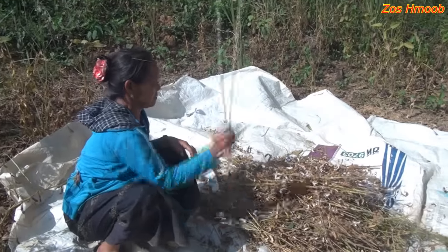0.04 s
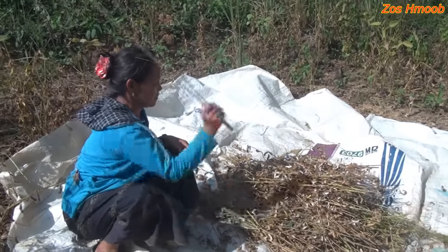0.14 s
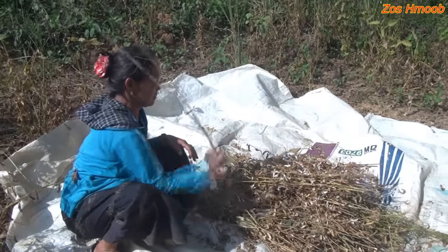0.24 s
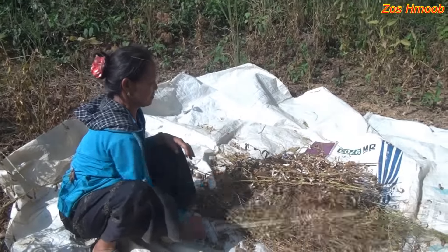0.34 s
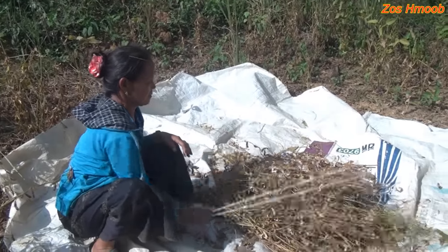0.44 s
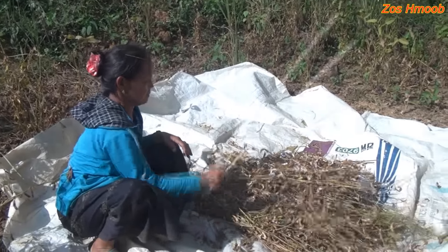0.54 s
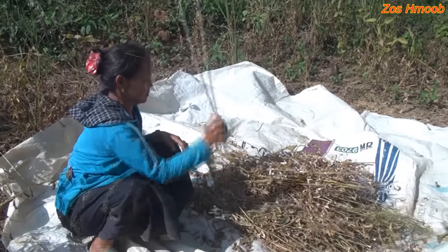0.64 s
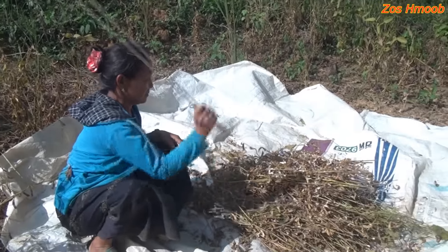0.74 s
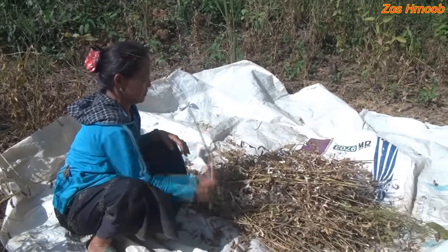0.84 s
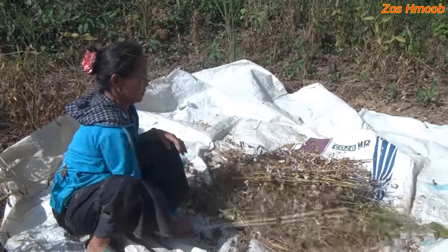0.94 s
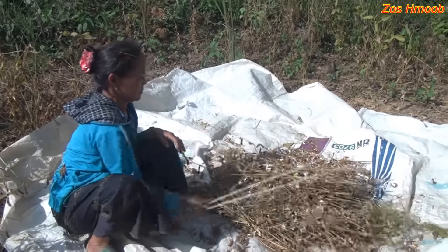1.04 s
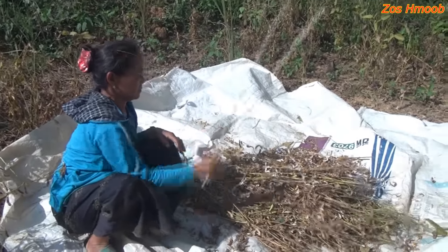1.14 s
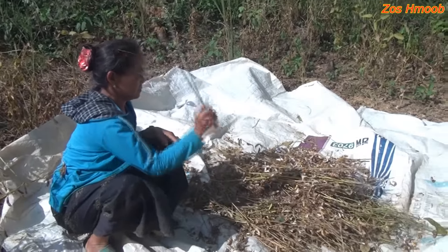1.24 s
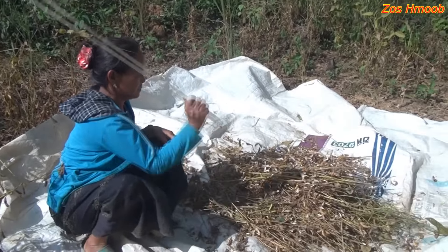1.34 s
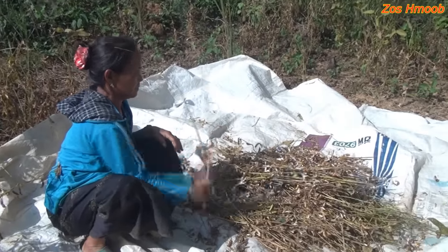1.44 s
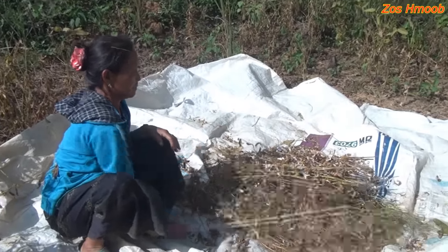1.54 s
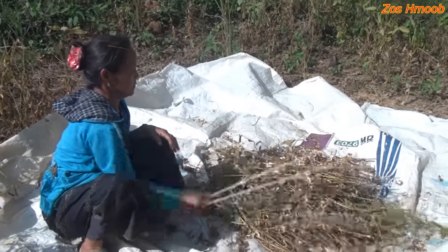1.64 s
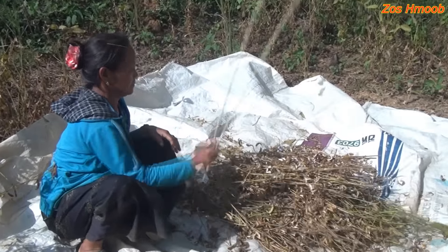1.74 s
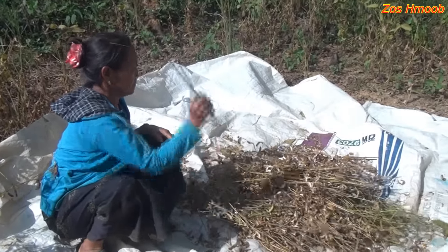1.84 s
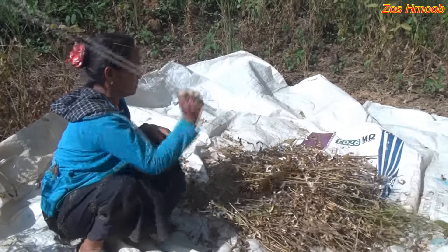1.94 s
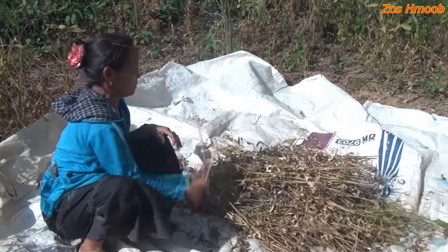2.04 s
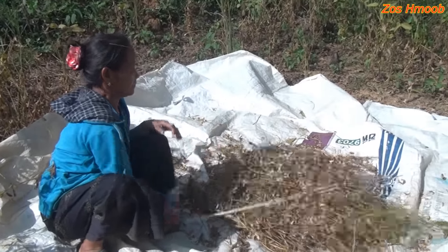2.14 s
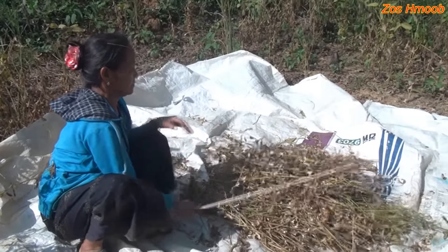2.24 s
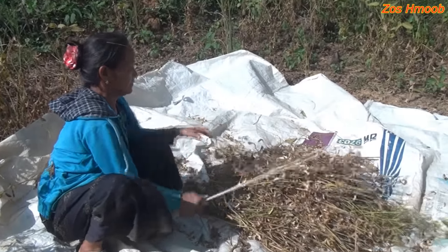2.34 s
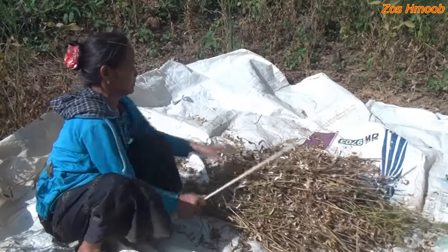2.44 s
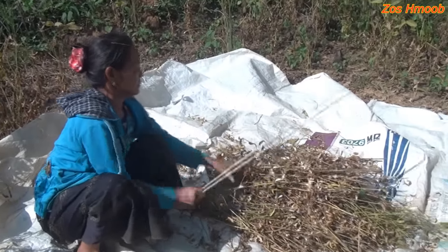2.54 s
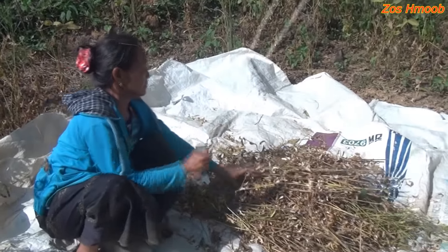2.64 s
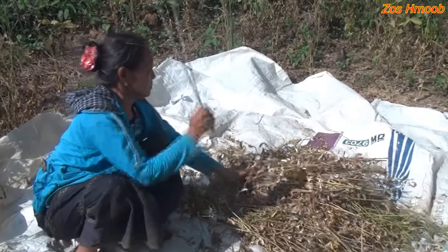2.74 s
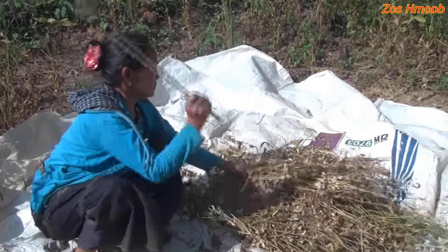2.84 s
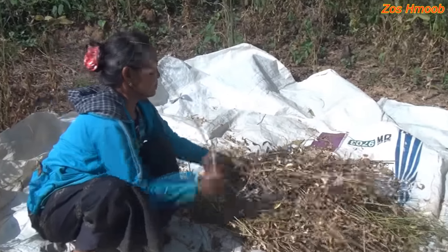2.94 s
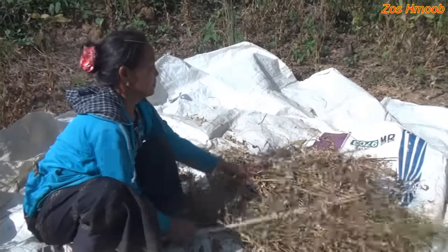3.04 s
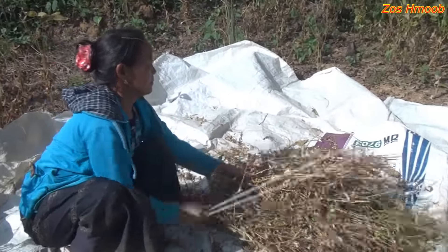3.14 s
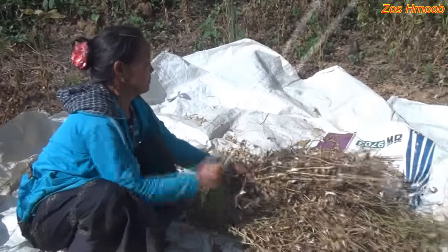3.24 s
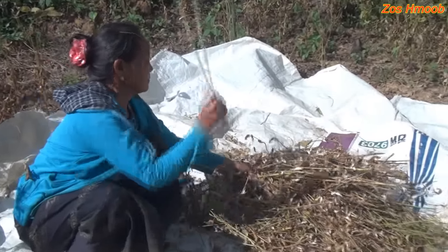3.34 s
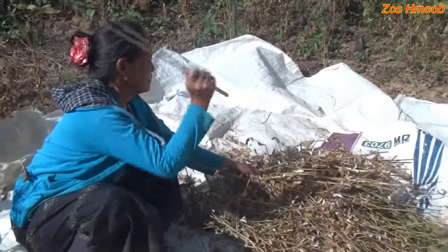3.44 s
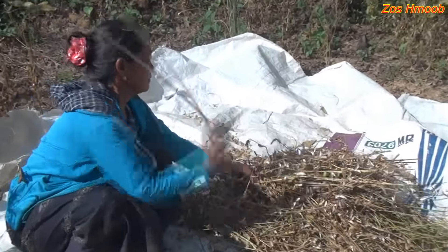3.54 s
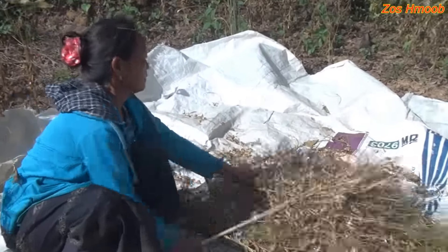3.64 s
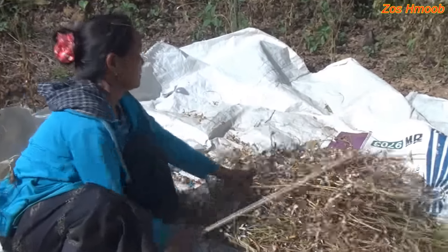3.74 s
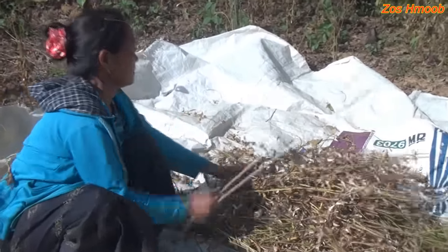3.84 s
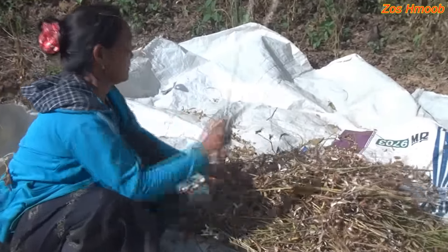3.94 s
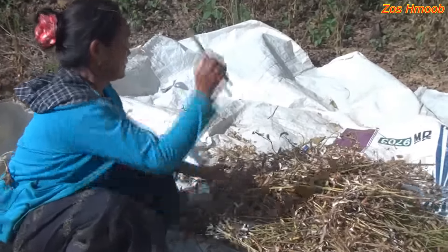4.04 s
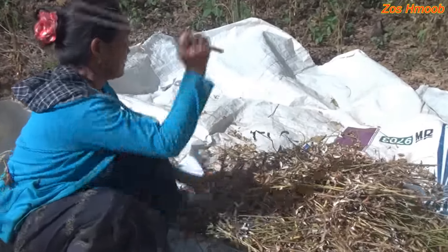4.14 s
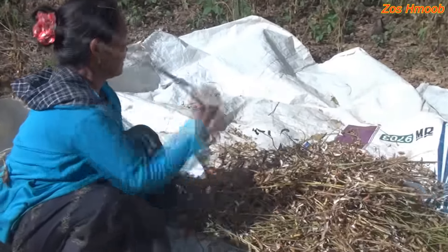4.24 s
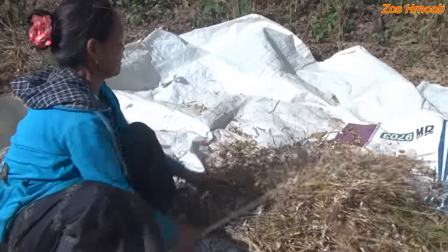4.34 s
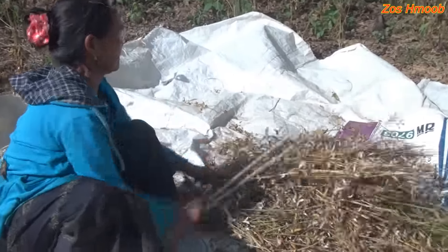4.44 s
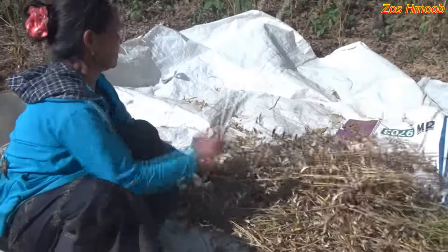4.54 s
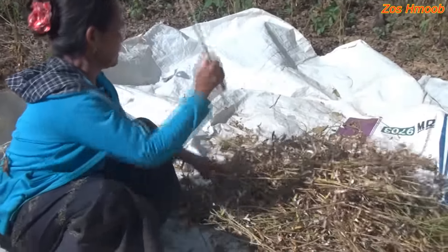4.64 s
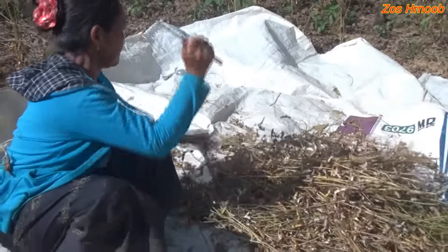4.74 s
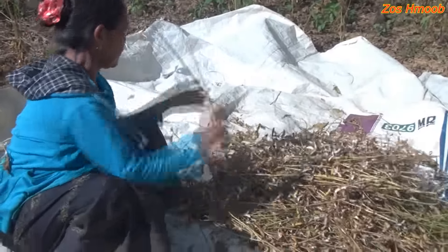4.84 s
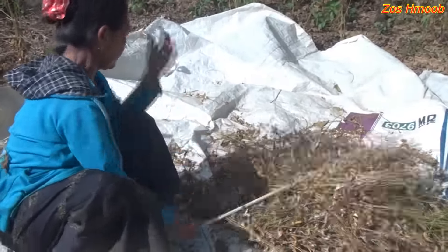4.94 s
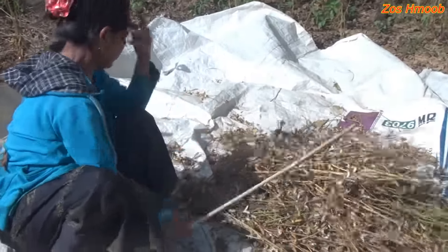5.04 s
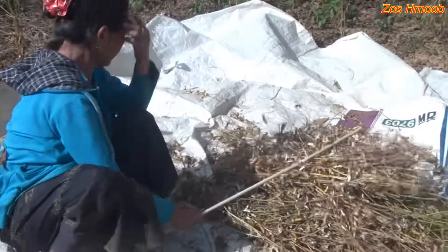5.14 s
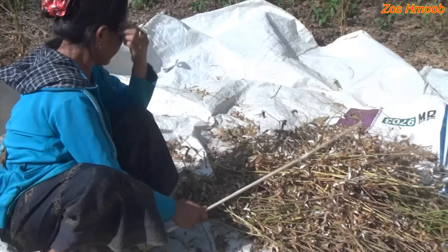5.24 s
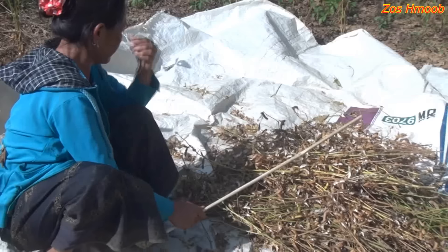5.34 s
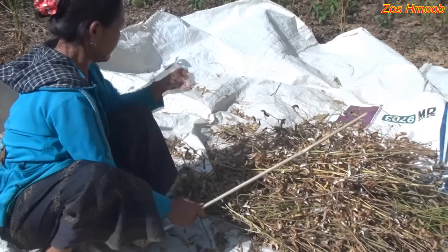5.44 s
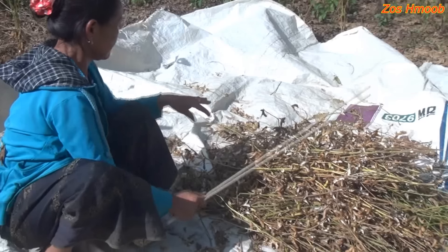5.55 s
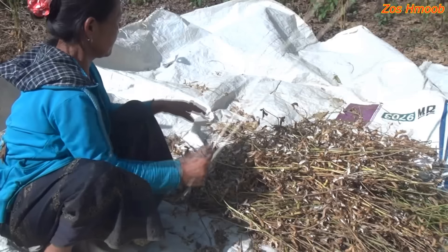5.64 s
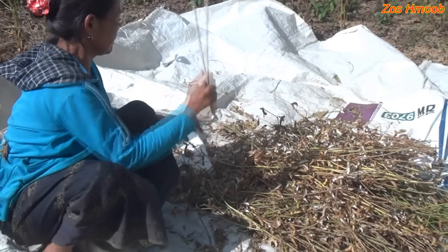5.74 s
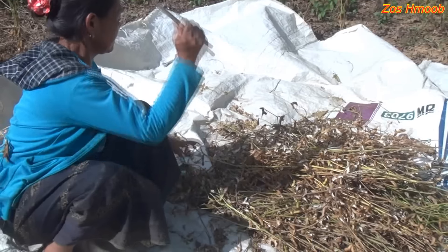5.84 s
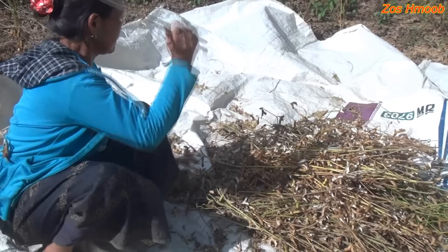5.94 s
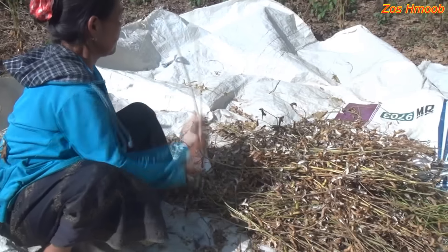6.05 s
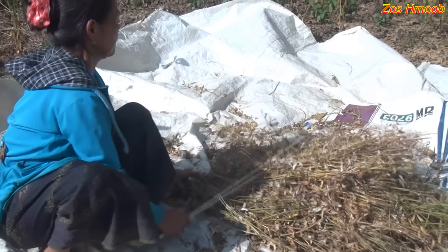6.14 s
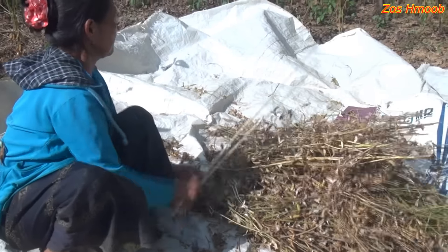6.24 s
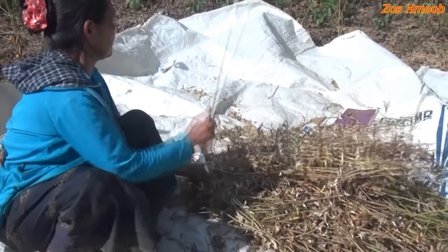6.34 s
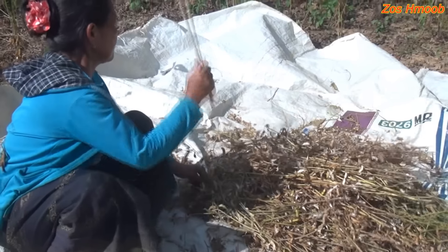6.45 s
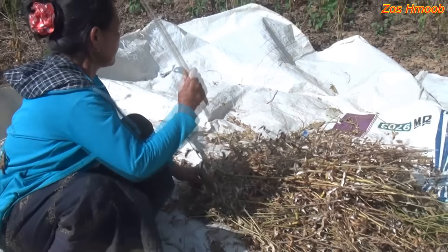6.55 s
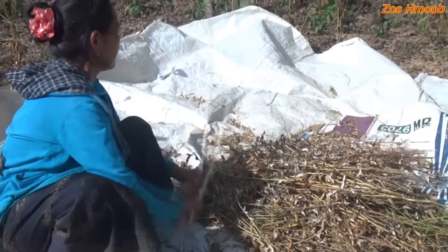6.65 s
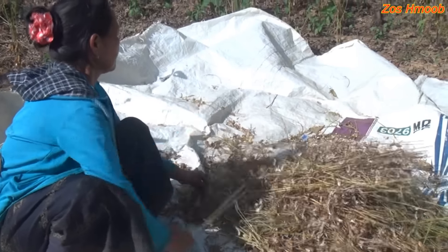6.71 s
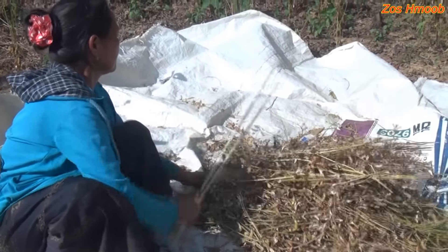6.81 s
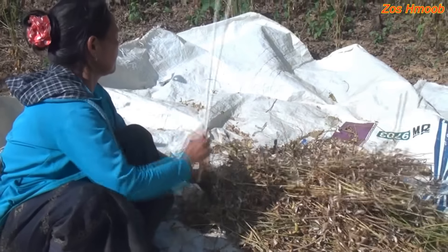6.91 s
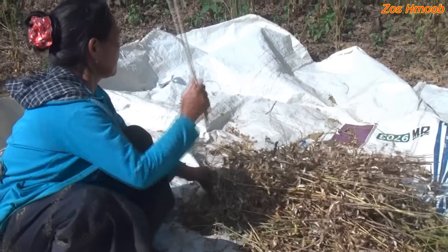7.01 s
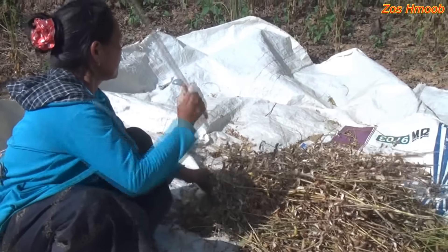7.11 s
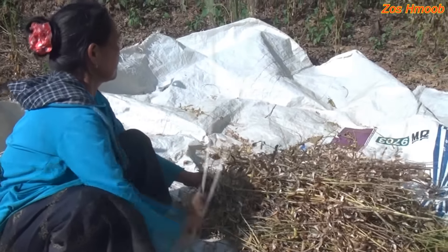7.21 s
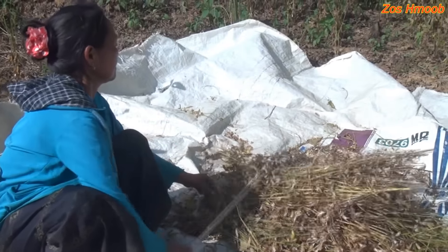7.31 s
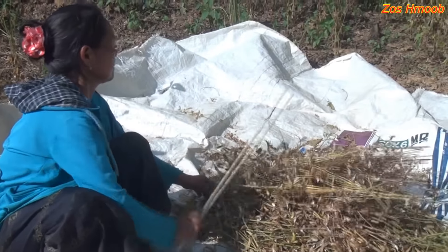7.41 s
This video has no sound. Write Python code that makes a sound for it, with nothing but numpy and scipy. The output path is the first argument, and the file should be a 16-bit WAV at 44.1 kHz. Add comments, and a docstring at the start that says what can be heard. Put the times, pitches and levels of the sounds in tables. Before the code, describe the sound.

Thin sticks whip a heap of dry stalks in an uneven rhythm, each sharp crackling crack followed by rustling, while crickets trill behind.

```python
"""The dying rustle of an earlier blow, under cricket trills; then thin sticks whip a heap of dried stalks.
The heap lies outdoors on a plastic tarp, to the right. Swings hum as a gliding tone with breathy noise.
Blows are enveloped noise and grains: crack, slap, shower, thud. Snaps are short pitched bursts.
Rubbing noise and grains make the rustle as sticks lift and a hand stirs; loose seeds rattle in pods.
Behind: two crickets of pulsed tone, faint sliding whistles, open-air hiss and a low hum."""
import sys
import numpy as np
from scipy import signal
from scipy.fft import rfft, irfft, next_fast_len
from scipy.io import wavfile
from scipy.ndimage import uniform_filter1d, map_coordinates

SR = 44100
rng = np.random.default_rng(int(sys.argv[2]) if len(sys.argv) > 2 else 0)


def boost(x):
    """Linear amplitude factor 10**(x/20) for a level x in decibels (scalar or array-like)."""
    u = np.asarray(x, float) / 20
    return 10 ** u


def unload_audio(sound):
    """Save the sound as a 16-bit wav file, at the path given as the first command line argument."""
    columns = np.transpose(np.atleast_2d(sound))
    # keep every value between -1 and 1, then stretch to whole-number steps
    steps = np.round(np.clip(columns, -1, 1) * 32767)
    wavfile.write(sys.argv[1], SR, steps.astype(np.int16))


N = 329720


# blows: start_s, strength_db, slap_db (re strength), thud_db (re strength), contact_s
BLOWS = [(0.4845, -4.5, -16, -38, 0.0043), (1.063, -4, -13.5, -37, 0.0053),
         (1.6601, -4.5, -11.5, -36, 0.0054), (2.2444, -5.5, -16, -43, 0.0029),
         (3.161, -4, -17, -42.5, 0.0046), (3.7722, -4, -16.5, -35.5, 0.0053),
         (4.4874, -5.5, -14, -35.5, 0.0066), (5.0801, -5.5, -16, -35.5, 0.0012),
         (6.2625, -6.5, -12, -39, 0.0015), (6.8337, -5, -11, -32.5, 0.0042), (7.4004, -5, -12, -31, 0.0031)]


def strikes(level_db, rise_s, t60_s, power, early_s=0):
    """Envelope of all blows: each swells as a power of a saturating rise and dies exponentially."""
    env, t = np.zeros(N + SR), np.arange(SR) / SR
    start_s = np.transpose(BLOWS)[0] - early_s
    for s, db, rise, t60 in np.broadcast(start_s, level_db, rise_s, t60_s):
        swell = (1 - np.exp(-t / rise)) ** power
        env[round(s * SR):][:SR] += boost(db - 60 * t / t60) * swell
    return env[:N]


# crack spectrum: freq_hz, density_db (per Hz)
CRACK_SPECTRUM = [(470, -40), (800, -14.5), (2800, -5), (4000, 0), (6000, -3.5), (9000, 0), (12000, -3.5),
                  (14500, -7), (16000, -22.5), (16500, -24.5)]
# first-break spectrum: freq_hz, density_db (per Hz)
BURST_SPECTRUM = [(2000, -23), (4000, -9), (9000, -2), (14500, -5), (16500, -20.5)]


def crack():
    """Stalks break along the stick: a bright first burst, then a longer crackle; the tips touch first."""
    _, db, _, _, contact_s = np.transpose(BLOWS)
    tips_early_s = np.transpose(SWINGS)[3]
    body = strikes(db - 9.5, contact_s * 0.69, 0.15, power=1.16)
    touch = strikes(db - 15.5, 0.002, 0.095, power=2.0, early_s=tips_early_s)
    burst = strikes(db - 6.5, contact_s * 0.48, 0.028, power=1.56)
    body = body * crackle(CRACK_SPECTRUM, lumpy_db=1, spiky_db=3.2)
    return body + (burst + touch) * crackle(BURST_SPECTRUM, lumpy_db=3.2, spiky_db=2.4)


# tarp slap spectrum: freq_hz, density_db (per Hz)
SLAP_SPECTRUM = [(150, -47.5), (250, -3.5), (600, -4.5), (1200, -2.5), (2000, 1.5), (4000, -6),
                 (8000, -33.5)]


def slap():
    """The tarp slaps after the crack: slower-rising, darker noise and grains."""
    _, db, slap_db, _, _ = np.transpose(BLOWS)
    env = strikes(db + slap_db, 0.0072, 0.11, power=3.9)
    noise = env * crackle(SLAP_SPECTRUM, lumpy_db=2.5, spiky_db=1)
    return noise + grains(boost(-4) * env, count=8000, hz=1500, spread=.9, cycles=1.5, scatter_db=3)


# falling bits spectrum: freq_hz, density_db (per Hz)
SHOWER_SPECTRUM = [(180, -17.5), (300, -6), (1580, -1.5), (1770, -8), (2000, -2), (2840, -5.5),
                   (4170, -1.5), (10700, -4), (15400, -13), (16500, -45.5)]


def shower():
    """Bits shower down: late, long-dying noise and high grains."""
    env = strikes(np.transpose(BLOWS)[1] - 24.0, 0.0155, 0.38, power=6.0)
    noise = env * crackle(SHOWER_SPECTRUM, lumpy_db=2, spiky_db=2.5)
    return noise + grains(boost(-5) * env, count=9000, hz=5000, spread=1.1, cycles=2.2, scatter_db=3.5)


def thud():
    """Low thump of each blow: band of noise around 250 Hz."""
    _, db, _, thud_db, _ = np.transpose(BLOWS)
    spectrum = [(48, -40), (72, 0.5), (250, 6.5), (500, -19.5)]
    env = strikes(db + thud_db, 0.0096, 0.16, power=0.82)
    return env * crackle(spectrum, lumpy_db=-2.5, spiky_db=2.0)


def blows():
    """The stick lands along its length: stalks crack, the tarp slaps later, bits shower down."""
    return crack() + slap() + shower() + thud()


def small_snaps(count):
    """Chance snaps anywhere, their level following the rustle, in rows like SNAPS."""
    at, size, pitch, broad, side = rng.random((count, 5)).T
    start_s = .01 + at * (N / SR - .02)
    rustle = busy()[0][(start_s * SR).astype(int)]
    peak_db = 20 * np.log10(rustle) + 10.5 + 8 * (size - .5)
    left_right_db = -2 + 7 * (side - .5)
    return list(zip(start_s, peak_db, 3500 * 3.4 ** pitch, .6 * broad, left_right_db))


# clearest single stalks and pods snapping: start_s, peak_db, pitch_hz, breadth (0-1), left_right_db
SNAPS = [(0.15, -48, 600, 0.37, -9), (0.517, -23, 1880, 0.24, -16), (0.582, -31, 3400, 0.9, -18),
         (0.762, -38, 4000, 0.66, -8), (0.8452, -41, 4600, 0.7, -6), (0.928, -42, 1720, 0.8, -11),
         (1.302, -39, 12060, 0.3, -14), (1.353, -44, 11460, 0.2, -10), (1.538, -35.5, 3900, 0.98, -3),
         (1.896, -36, 4000, 0.54, -13), (2.0257, -41, 4350, 0.05, -10), (2.0761, -34.5, 1450, 0.78, -13.5),
         (2.1354, -40, 1190, 0.7, -8), (2.1422, -42, 1570, 0.76, -12), (2.3483, -32, 5140, 0.4, -9),
         (2.5461, -37, 8530, 0, -6), (2.638, -46, 1300, .6, -8), (2.6866, -38, 10850, 0.7, -12),
         (2.9569, -26, 10080, 0.2, -10), (2.986, -26, 8400, 0.35, -9), (2.9983, -30, 8350, 0.4, -7),
         (3.013, -24, 8180, 0.4, -5), (3.058, -28, 8010, 0.5, -6), (3.2157, -21, 5370, 0.2, -7),
         (3.451, -29, 4700, 0.23, -8), (3.4574, -35, 4520, 0, -9), (3.6817, -33.5, 10500, .9, -4),
         (3.8319, -19, 1820, 0.87, -8), (3.8568, -23, 1900, 1, -12), (4.1017, -37, 3360, 0.52, -12),
         (4.2756, -40, 4420, 0.24, -11), (4.3682, -40, 1970, 0.35, -3), (4.394, -34.5, 2230, 0.43, -5),
         (4.4024, -31.5, 3960, 0.9, -5.5), (4.5814, -23.5, 8560, 0.3, -6), (5.3265, -40, 8060, 0.3, -5),
         (5.768, -33.5, 12300, 0.27, -11), (5.9696, -34, 1950, 0.72, -5.5),
         (6.1118, -44.5, 1406, 0.52, -6.5), (6.326, -27, 10600, 0.49, -2), (6.8472, -10.5, 1460, 0.78, -9),
         (7.2127, -33.5, 10000, 0.04, -9), (7.2529, -40, 10080, 0.28, -10), (7.3387, -35, 1350, 0.86, -7)]


def snaps():
    """A snap is a burst of a few milliseconds, coloured round the stalk's pitch."""
    size, lead = 1024, 32  # samples
    out, t = np.zeros((2, N + 2048)), np.arange(size) / SR
    freq_hz = np.fft.rfftfreq(size, 1 / SR) + 1
    rows = SNAPS + small_snaps(count=40)
    noises = rng.standard_normal((len(rows), size))
    for (s, db, hz, breadth, left_right_db), noise in zip(rows, noises):
        burst = noise * (np.exp(-t / 0.00084) + 0.17 * np.exp(-t / 0.0072))
        width_octaves = 0.17 + 1.44 * np.clip(breadth, 0, 1) ** 2
        distance = np.log2(freq_hz / hz) / width_octaves
        colour = np.exp(-distance ** 2 / 2) * (freq_hz > 400)
        snap = np.roll(irfft(rfft(burst) * colour), lead)
        at = round(s * SR) - lead
        sides = boost(db + left_right_db * np.array([[.5], [-.5]]))
        out[:, at:at + size] += sides * snap / np.abs(snap).max()
    return out[:, :N]


# downswing shape: length_share, gain_db, top_pitch_share
ARC = [(-.2, -33, .6), (0, -6, .68), (.2, -4, .82), (.6, 5, 1.0), (.8, 2, .9), (1.0, 7.5, .85),
       (1.25, -17.5, .8), (1.6, -42.5, .7)]
# one downswing a blow: length_s, hum_db (before ARC gain), top_pitch_hz, tips_early_s
SWINGS = [(.078, -50.5, 270, 0.0031), (0.0804, -54.5, 235, 0.0045), (0.069, -48.5, 251.5, 0.0036),
          (0.0662, -50, 300, 0.0023), (0.053, -55, 260, 0.0026), (0.055, -52, 270, 0.0017),
          (0.0568, -50.5, 280, 0.0018), (0.0628, -51.5, 240, 0.0043), (0.071, -59.5, 190, 0.0048),
          (0.0626, -62, 190, 0.0012), (0.053, -53.5, 210, 0.0023)]


def swings():
    """Air sheds vortices off the stick: a breathy hum that climbs with speed and sags as the arm brakes."""
    rows = []
    for (end_s, *_), (length_s, hum_db, top_hz, _) in zip(BLOWS, SWINGS):
        for share, gain_db, pitch_share in ARC:
            rows.append((end_s - length_s * (1 - share), hum_db + gain_db, top_hz * pitch_share))
    level_db, pitch_hz = curves(rows)
    phase = 2 * np.pi * np.cumsum(pitch_hz) / SR + .9 * wobble(55)
    breath = crackle([(90, -30), (160, 0), (330, -2), (900, -32)], lumpy_db=.1, spiky_db=.1)[0]
    hum = np.sin(phase) + .5 * breath
    return hum * boost(level_db + 2.8 * wobble(70) + [[-6.2], [3.5]])  # left, right dB


# sticks pulled out after each blow; faint rows are stalks slipping back:
# fullest_s, rustle_db, hold_s, creak_db (re rustle)
LIFTS = [(0.13, -54.5, 0.014, -5.5), (0.69, -53, 0.015, -3.5), (1.27, -53.5, 0.026, -9),
         (1.87, -54, 0.022, -1), (2.04, -66, 0.11, 3), (2.449, -53.5, 0.056, -11.5),
         (3.299, -50.5, 0.042, -15), (3.909, -51.5, 0.04, -24), (4.69, -52.5, 0.057, -8),
         (5.29, -54.5, .03, -13), (6.05, -67, 0.16, -1.5), (6.46, -52, 0.11, -8.5), (6.75, -66, 0.08, 0),
         (7.04, -52, 0.087, -4.5), (7.3, -72, 0.086, 2)]
# free hand raking and turning stalks: time_s, rustle_db, creak_db (re rustle)
STIR = [(2.6, -90, -7.5), (2.7, -74, -18), (2.79, -51.5, -8.5), (2.84, -49, -10), (2.895, -39, -14.5),
        (2.956, -43, -15), (3.04, -43.5, -16.5), (3.12, -50, -6), (3.44, -55, -7), (3.52, -64, 1),
        (3.66, -61, -8.5), (3.73, -52, 0), (4.06, -58.5, -2.5), (4.2, -57, -7.5), (4.3, -62, 0),
        (4.373, -51.5, -5.5), (4.45, -58.5, -1), (4.7, -87, 1)]


def busy():
    """Amplitude of rustle and creak: lifts, stirring hand, rest and the earlier blow add as powers."""
    rise_db_s, fall_db_s = 70, 130.5
    settle_db, settle_db_s = -10, 27  # stalks go on settling: start re lift, fall rate
    t = np.arange(N) / SR
    stir_db, stir_creak_db = curves(STIR)
    earlier = boost(-44 - 140 * t) ** 2  # dying rustle of the blow just before
    rustle = boost(-80.5) ** 2 + boost(stir_db) ** 2 + earlier
    creak = boost(-71.5) ** 2 + boost(stir_db + stir_creak_db) ** 2 + boost(-5) ** 2 * earlier
    for s, db, hold_s, creak_db in LIFTS:
        before_s, after_s = np.maximum(s - t, 0), np.maximum(t - s - hold_s, 0)
        fall = boost(-fall_db_s * after_s) ** 2 + boost(settle_db - settle_db_s * after_s) ** 2
        lift = boost(db - rise_db_s * before_s) ** 2 * fall
        rustle, creak = rustle + lift, creak + boost(creak_db) ** 2 * lift
    return np.sqrt(rustle), np.sqrt(creak)


# stalk rustle spectrum: freq_hz, density_db (per Hz)
RUSTLE_SPECTRUM = [(1180, -19), (2000, -4.5), (4200, 1.5), (4670, 0), (6700, -2), (8580, 1.5), (12800, -2),
                   (15800, -12.5), (16500, -33)]
# tarp creak spectrum: freq_hz, density_db (per Hz)
CREAK_SPECTRUM = [(180, -49), (300, -4.5), (510, -6), (556, -6), (749, -4.5), (3000, -6), (3900, -4.5),
                  (6600, -120)]


def heap():
    """Stalks rub and tick, the tarp under them creaks: patchy noise plus grains."""
    rustle, creak = busy()
    rustle = rustle * boost(1.6 * wobble(38))
    creak = creak * boost(0.92 * wobble(27))
    rub = patchy(crackle(RUSTLE_SPECTRUM, lumpy_db=1.6, spiky_db=2), depth_db=2)
    flex = patchy(crackle(CREAK_SPECTRUM, lumpy_db=2.2, spiky_db=1.1), depth_db=2.5)
    ticks = grains(boost(-6) * rustle, count=7000, hz=7500, spread=.7, cycles=2, scatter_db=3.2)
    knocks = grains(boost(-5) * creak, count=2500, hz=1600, spread=.8, cycles=1.8, scatter_db=3.3)
    return rustle * rub + creak * flex + ticks + knocks


# pods rattling: start_s, end_s, level_db
RATTLE = [(1.86, 2.075, -62), (2.34, 2.475, -58.5), (4.265, 4.31, -55.5)]


def rattle():
    """Loose seeds chink in dry pods, all near one pitch."""
    edge_s = .015
    t, env = np.arange(N) / SR, np.zeros(N)
    for start_s, end_s, db in RATTLE:
        env += boost(db) * np.clip(np.minimum(t - start_s, end_s - t) / edge_s + .5, 0, 1)
    return grains(env, count=2500, hz=4400, spread=.06, cycles=9, scatter_db=3.5)


def cricket(stroke, hz, arch_hz, drop_hz, gap, rough):
    """One tone per wing stroke; its pitch arches and sags at the end, the level dips before the next."""
    u = stroke % 1
    pitch_hz = hz + arch_hz * np.sin(np.pi * u) - drop_hz * u ** 4 - 200 * np.exp(-stroke)
    flutter = boost(1.1 * wobble(30) + rough * 3 * wobble(300))
    shape = np.clip(np.sin(np.pi * u) - gap, 0, .7) * flutter
    return unit(shape * np.sin(2 * np.pi * np.cumsum(pitch_hz) / SR + rough * wobble(400)))


# near cricket phrases: start_s, end_s, level_db (before left/right gains)
TRILL = [(-.02, 0.302, -64.5), (0.624, 1.097, -64), (1.346, 2.08, -64), (2.369, 2.904, -65),
         (3.192, 3.75, -63.5), (4.006, 4.759, -64), (4.919, 5.669, -65.5), (5.795, 6.632, -64),
         (6.954, 7.6, -65)]


def near_cricket():
    """Trills in phrases at 29.15 wing strokes a second."""
    t, level, stroke = np.arange(N) / SR, np.zeros(N), np.zeros(N)
    for start_s, end_s, db in TRILL:
        on = (t >= start_s) & (t < end_s)
        stroke[on] = 29.15 * (t[on] - start_s)
        fade = np.minimum((t[on] - start_s) / 0.04, (end_s - t[on]) / 0.042)
        level[on] = boost(db) * np.clip(fade, 0, 1)
    tone = cricket(stroke, hz=7150, arch_hz=50, drop_hz=300, gap=0.05, rough=.55)
    return level * boost([[-3], [1.5]]) * tone


def far_cricket():
    """Trills without pause at 42.4 wing strokes a second."""
    stroke = 42.4 * np.arange(N) / SR + .144
    level = boost(-73 + 1.1 * wobble(2) + [[-2.5], [1.5]])
    return level * cricket(stroke, hz=8220, arch_hz=300, drop_hz=30, gap=.2, rough=0.35)


# sliding whistles: start_s, end_s, from_hz, to_hz, level_db (before left/right gains)
GLIDES = [(.41, .475, 8700, 11600, -69), (.995, 1.04, 8900, 10300, -69), (2.175, 2.235, 8500, 11000, -69),
          (2.565, 2.67, 6600, 4750, -70), (2.685, 2.765, 4950, 6250, -70)]


def glides():
    """Faint thin whistles: sines that slide in pitch with a slightly blurred phase."""
    t, out, blur = np.arange(N) / SR, np.zeros(N), .5 * wobble(700)
    for start_s, end_s, from_hz, to_hz, db in GLIDES:
        u = np.clip((t - start_s) / (end_s - start_s), 0, 1)
        shape = np.sqrt(np.abs(np.sin(np.pi * u))) * (u < 1)
        phase = 2 * np.pi * np.cumsum(from_hz + (to_hz - from_hz) * u) / SR
        out += boost(db) * shape * np.sin(phase + blur)
    return out * boost([[-3], [2.2]])


# open-air spectrum: freq_hz, density_db (per Hz)
AIR_SPECTRUM = [(15, -41.5), (25, -9.5), (172, -1.5), (368, -0.5), (952, 0.5), (3320, -3), (5880, -11.5),
                (7110, -8), (7710, -7.5), (8600, -8), (9580, -35), (15200, -12.5), (16500, -28.5)]


def air():
    """Soft open-air hiss: shaped noise, slowly wavering."""
    return boost(-61 + 1.5 * wobble(3)) * crackle(AIR_SPECTRUM, lumpy_db=1.5, spiky_db=-0.9)


# faint low hum: time_s, level_db (before wobble)
HUM = [(.2, -71), (.31, -64), (.4, -80), (.6, -72), (2.4, -79), (4.7, -77.5), (5.6, -79), (5.8, -67.5),
       (5.95, -80)]


def low_hum():
    """A low hum comes and goes: narrow noise near 330 Hz."""
    noise = crackle([(270, -31.0), (330, 0.5), (400, -27)], lumpy_db=-1.2, spiky_db=4.5)
    return boost(curves(HUM)[0] + 4.5 * wobble(20)) * noise


# field at the microphone pair: freq_hz, left_right_db
FIELD_SIDE = [(60, -5.5), (130, -10.5), (290, -12), (640, -9), (1410, 3.5), (3100, 1.5), (6820, 3.5),
              (15000, -13.5)]
# field at the microphone pair: freq_hz, likeness (0-1)
FIELD_ALIKE = [(60, .4), (250, 0.48), (700, 0.037), (2400, 0.0488), (6000, 0.18), (15000, .5)]


def field():
    """Crickets over wide hiss and hum."""
    return near_cricket() + far_cricket() + ports(air() + low_hum(), FIELD_SIDE, FIELD_ALIKE)


def unit(x):
    """Scaled to rms 1."""
    return x / np.sqrt(np.mean(x ** 2) + 1e-20)


def along(points, hz):
    """(Hz, value) points on a log axis."""
    f, v = np.transpose(points)
    return np.interp(np.log(hz + 1), np.log(f + 1), v)


def curves(rows):
    """One value per sample for each column after the time."""
    s, *cols = np.transpose(rows)
    return [np.interp(np.arange(N) / SR, s, c) for c in cols]


def wobble(rate_hz):
    """A smooth random curve, rate_hz knots a second."""
    knots = rng.standard_normal(int(N * rate_hz / SR) + 4)
    return map_coordinates(knots, [np.arange(N) * rate_hz / SR])


def filtered(x, response):
    """x times a response of frequency."""
    m = next_fast_len(N + 8192)
    return irfft(rfft(x, m) * response(np.fft.rfftfreq(m, 1 / SR)), m)[..., :N]


def ports(pair, side, alike):
    """Two unrelated versions of a wide source become left and right of set likeness and level difference."""
    def mixing(hz):
        turn = np.arccos(np.clip(along(alike, hz), 0, 1)) / 2
        return np.array([np.cos(turn), np.sin(turn)])

    def tilt(hz):
        return boost(along(side, hz) * np.array([[.5], [-.5]]))

    mid, off = filtered(pair, mixing)
    return filtered(np.array([mid + off, mid - off]), tilt)


def crackle(spectrum, lumpy_db, spiky_db):
    """Two streams of countless tiny breaks: noise in millisecond lumps and spikes, rms 1."""
    lumps = boost(lumpy_db * wobble(250) + spiky_db * wobble(2500))
    noise = lumps * rng.standard_normal((2, N))
    return unit(filtered(noise, lambda hz: boost(along(spectrum, hz))))


def grains(env, count, hz, spread, cycles, scatter_db):
    """Random little breaks, each a few cycles at its own pitch, their stream scaled by env."""
    length = 192  # samples
    at, pitch, size, split = rng.random((count, 4)).T
    pitch_hz = np.clip(hz * np.exp(spread * (2 * pitch - 1)), 300, 15000)[:, None]
    t = np.arange(length) / SR
    peak = boost(-scatter_db * np.log(size + .004))[:, None]
    wave = np.sin(2 * np.pi * pitch_hz * t) * np.exp(-t * pitch_hz / cycles) * peak
    index = ((at * N).astype(int)[:, None] + np.arange(length)).ravel()
    pair = []
    for share in (np.cos(2 * np.pi * split), np.sin(2 * np.pi * split)):
        pair.append(np.bincount(index, (wave * share[:, None]).ravel(), N + length)[:N])
    return env * unit(filtered(np.array(pair), lambda f: f ** 2 / (f ** 2 + (hz / 3) ** 2)))  # low cut


def patchy(pair, depth_db):
    """Rubbing comes from here and there: random patches in pitch and time swell and fade."""
    z = signal.stft(pair, nperseg=256)[2]
    patches = uniform_filter1d(rng.standard_normal(z.shape[1:]), size=7, axis=0)
    patches = uniform_filter1d(patches, size=5, axis=1)
    return unit(signal.istft(z * boost(depth_db * unit(patches)), nperseg=256)[1][:, :N])


# heap at the microphone pair: freq_hz, left_right_db
HEAP_SIDE = [(60, -14.0), (130, -12.5), (290, -10.5), (640, -8.0), (1410, -6.0), (3100, -3.0), (6820, -6.0),
             (15000, -9.5)]
# heap at the microphone pair: freq_hz, likeness (0-1)
HEAP_ALIKE = [(100, 0.87), (1400, 0.65), (15000, 0.73)]


def scene():
    """Heap sounds share one place; the field lies all round."""
    heap_place = ports(blows() + heap() + rattle(), HEAP_SIDE, HEAP_ALIKE)
    return heap_place + snaps() + swings() + glides() + field()


def band_limit(x):
    """A steep low-pass at the top of the band."""
    return signal.sosfilt(signal.butter(12, 16950, fs=SR, output="sos"), x)


# microphone response: freq_hz, gain_db
MIC = [(15500, 0.5), (16200, -10.5), (17000, -32)]


def record(dry):
    """Peaks bend softly near full scale, then the microphone drops the top."""
    bent = dry / (1 + np.abs(dry) ** 4) ** (1 / 4)
    mix = filtered(bent, lambda hz: boost(along(MIC, hz)))
    return band_limit(mix)


dry = scene()
out = record(dry)
unload_audio(out)
```